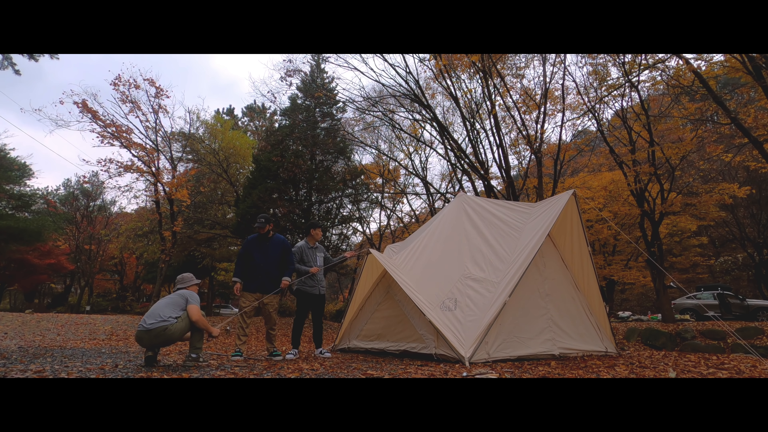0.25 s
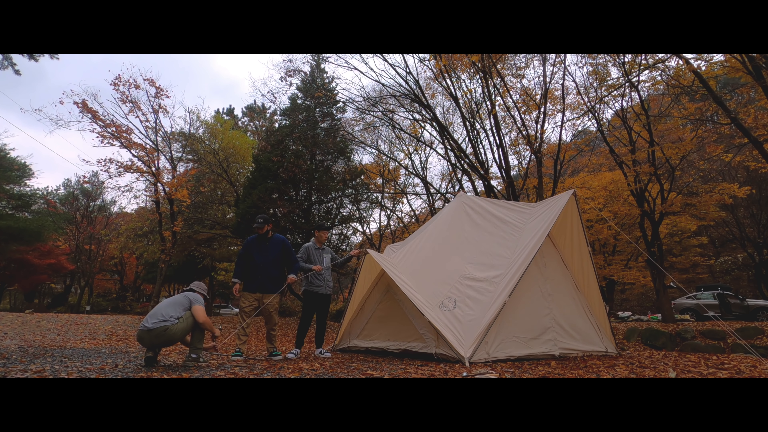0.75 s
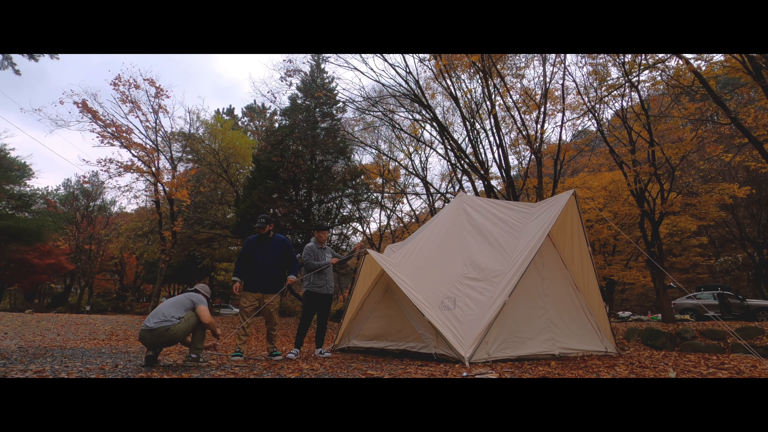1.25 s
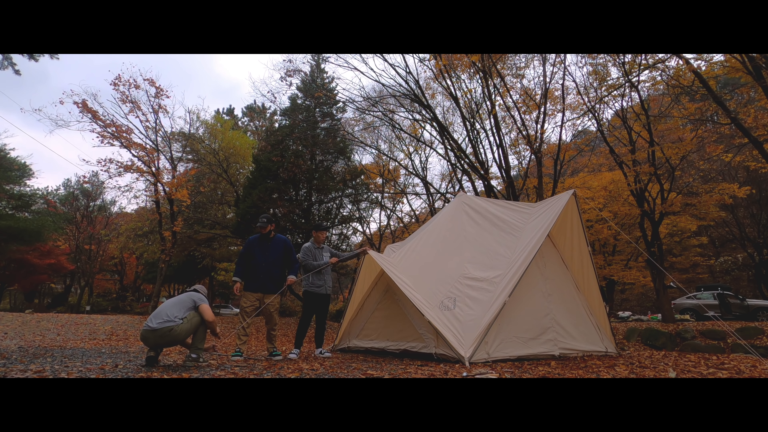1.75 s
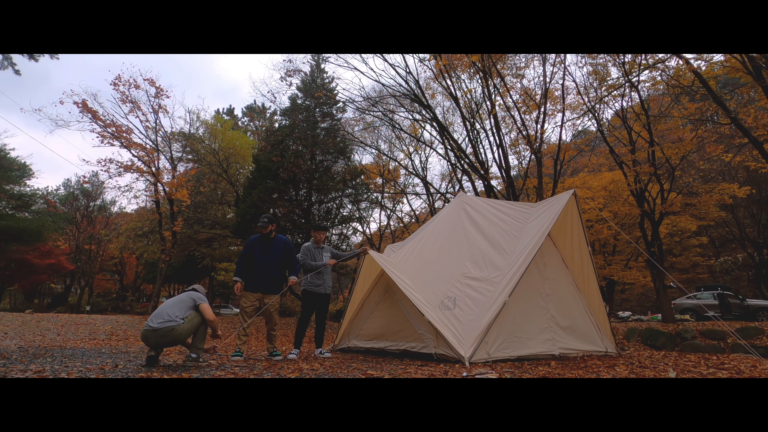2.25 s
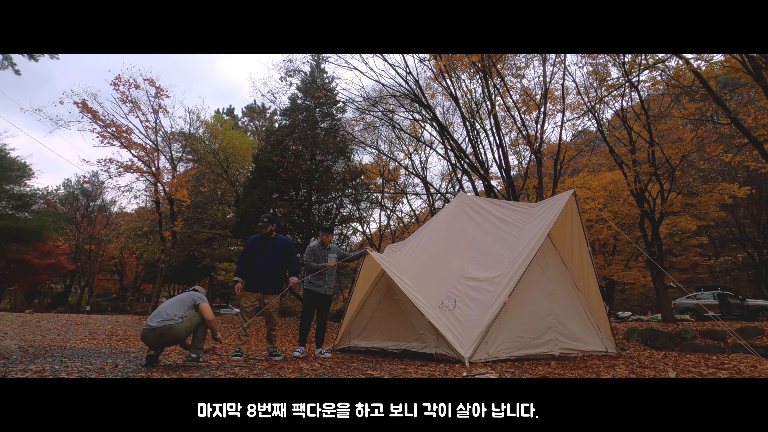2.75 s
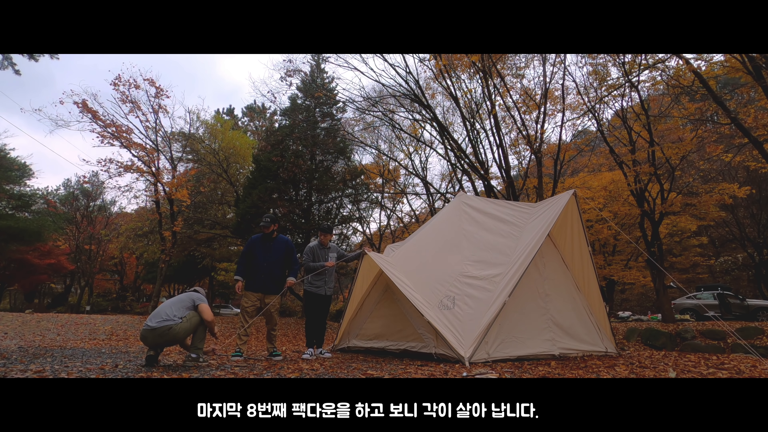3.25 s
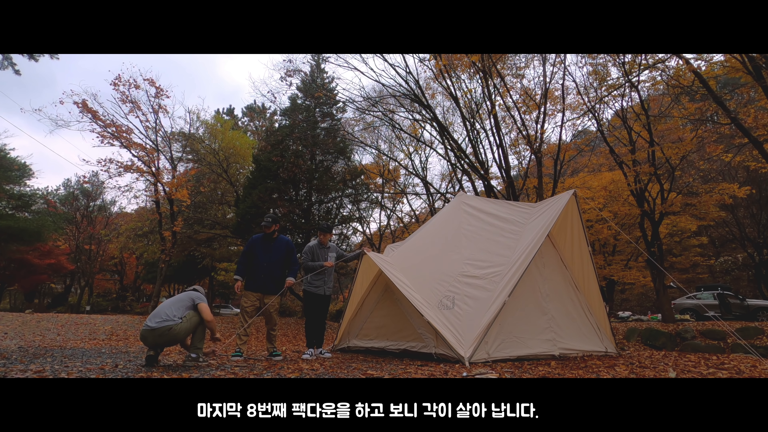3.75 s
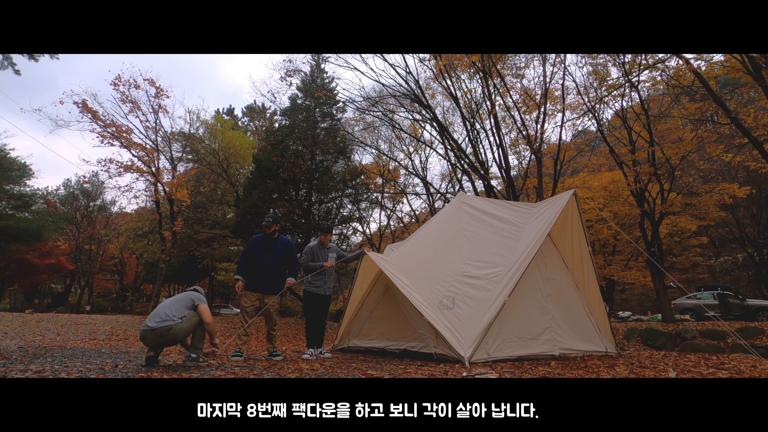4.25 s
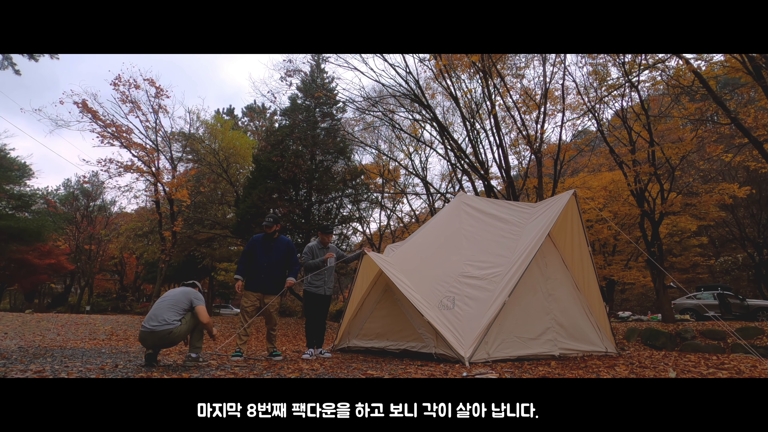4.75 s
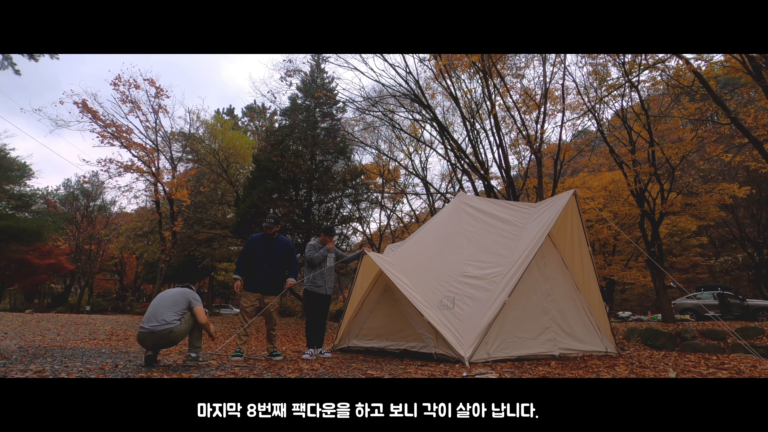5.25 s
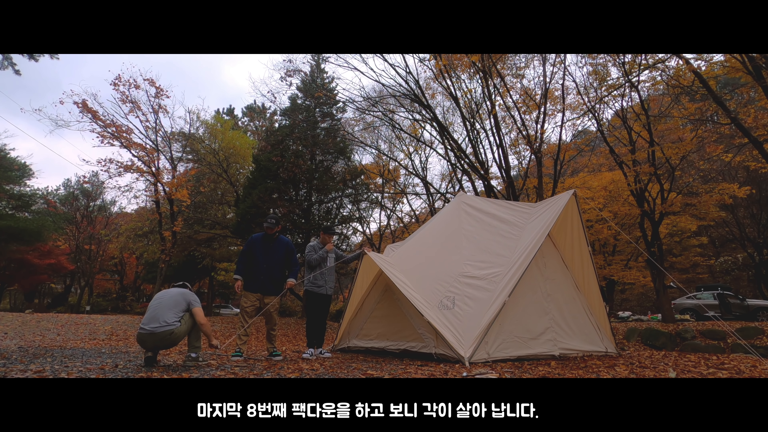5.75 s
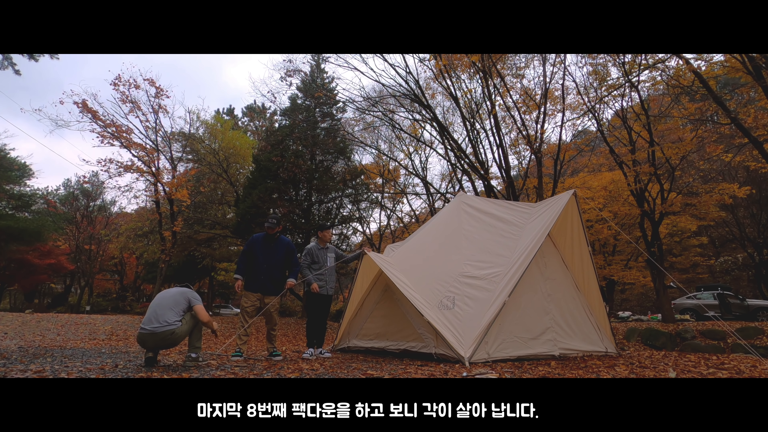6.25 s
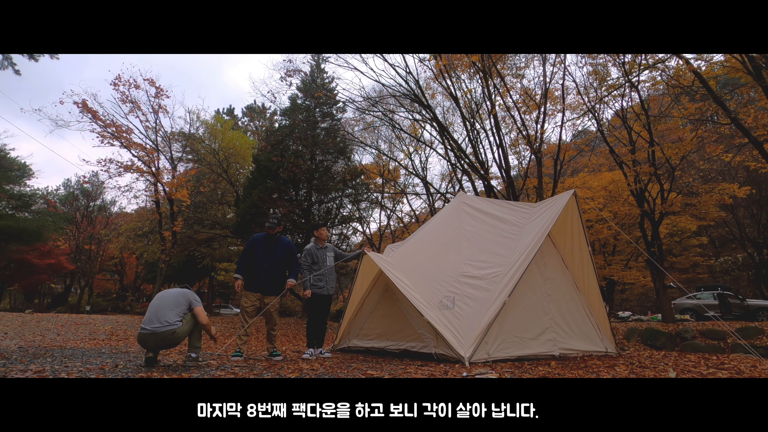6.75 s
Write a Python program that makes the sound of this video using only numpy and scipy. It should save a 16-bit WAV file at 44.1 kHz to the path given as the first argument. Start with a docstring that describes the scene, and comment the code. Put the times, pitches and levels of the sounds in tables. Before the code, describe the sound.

At a wooded campsite, a shoe scuffs gritty soil and loose metal pegs jingle lightly. Then a hammer, some metres away, drives a steel tent peg into the ground with quick, even blows. Each one cracks sharply, rings briefly and echoes from the trees, with a dull thud underneath. Faint wind, leaf hiss and a distant low hum lie behind, and soft gusts touch the microphone.

```python
"""A wooded campsite: a hammer drives a steel tent peg into soil, some metres away.
Each blow cracks, rings peg and hammer head, thuds into the ground and echoes from the trees.
Before it, a shoe scuffs and loose pegs jingle. Wind buffets, a far hum wavers, leaves hiss."""
import sys
import numpy as np
from scipy import signal
from scipy.fft import rfft, irfft, next_fast_len
from scipy.io import wavfile
from scipy.ndimage import uniform_filter1d, map_coordinates

SR = 44100
rng = np.random.default_rng(int(sys.argv[2]) if len(sys.argv) > 2 else 0)


def wrap_up_sound(samples):
    """Save the sound to the file named by the first command line argument, as 16-bit audio."""
    columns = np.atleast_2d(samples).T
    # keep every value between -1 and 1, then stretch to whole-number steps
    tamed = np.clip(columns, -1, 1)
    steps = np.round(tamed * 32767).astype(np.int16)
    wavfile.write(sys.argv[1], SR, steps)


N = 308423

# Each row: time in seconds, hum level in dB, wind level in dB.
AIR_LEVELS = [(0, -46.5, -49), (.31, -45.5, -47.5), (.54, -46, -50.5), (.78, -86, -50),
              (1.19, -49.5, -50.5), (1.44, -50.5, -51), (1.56, -67, -51.5), (1.83, -54.5, -56.5),
              (2.3, -54.5, -56), (3.1, -65, -53.5), (3.35, -62, -56), (4.46, -50, -56), (4.8, -65.5, -56),
              (5.37, -50.5, -57), (5.68, -51, -56.5), (5.96, -56, -54.5), (6.99, -57.5, -54)]


def amp(db):
    return 10 ** (np.asarray(db) / 20)


def unit(x):
    return x / np.sqrt(np.mean(x ** 2) + 1e-20)


def along(points, hz):
    """Interpolate (Hz, value) points on a log axis."""
    f, v = np.transpose(points)
    return np.interp(np.log(hz + 1), np.log(f + 1), v)


def curves(rows):
    """One value per sample for each column after the time."""
    times_s, *cols = np.transpose(rows)
    return [np.interp(np.arange(N) / SR, times_s, c) for c in cols]


def wobble(knots_per_s):
    """Smooth random curve."""
    knots = rng.standard_normal(int(N * knots_per_s / SR) + 4)
    return map_coordinates(knots, [np.arange(N) * knots_per_s / SR])


def noise(spectrum, size):
    """Coloured noise of rms 1."""
    m = next_fast_len(size)
    gain = amp(along(spectrum, np.fft.rfftfreq(m, 1 / SR)))
    return unit(irfft(rfft(rng.standard_normal(m)) * gain, m)[:size])


def ring(t, hz, t60_s, attack_s):
    """One damped mode, soft start, random phase."""
    envelope = amp(-60 * t / t60_s) * (1 - np.exp(-t / attack_s))
    return envelope * np.sin(2 * np.pi * (hz * t + rng.random()))


def add(track, start_s, x):
    track[round(start_s * SR):][:len(x)] += x


def buffeting():
    """Gusts hit the microphone: lumpy rumble over a deeper part."""
    # Each row: time in seconds, rumble level in dB, deep level in dB.
    gusts = [(0, -41.5, -90), (.056, -74, -81), (.114, -74, -71), (.17, -33, -60), (.21, -37, -55),
             (.386, -46, -62), (.572, -49, -62), (.62, -67, -78), (1.27, -55.5, -70), (1.31, -58, -37.5),
             (1.37, -45, -39), (1.48, -58, -51), (1.55, -66, -70), (3.0, -69, -77), (4.3, -56.5, -79),
             (5.1, -70, -65), (5.22, -49.5, -56), (5.7, -62, -90), (6.4, -54, -52), (6.99, -55, -67)]
    # Each row of both: frequency in Hz, level in dB.
    rumble_spectrum = [(35, -42), (58, 5.5), (90, 2.5), (140, -6.5), (300, -23), (2000, -120)]
    deep_spectrum = [(15, -39), (30, -8), (45, 13), (60, -1), (100, -59), (1000, -120)]
    rumble_db, deep_db = curves(gusts)
    rumble = unit(amp(0.57 * wobble(40)) * noise(rumble_spectrum, N))
    return amp(rumble_db) * rumble + amp(deep_db) * noise(deep_spectrum, N)


def far_hum():
    """A low tone wavering in pitch and level."""
    hum_db, _ = curves(AIR_LEVELS)
    waver_db = 2.2 * wobble(14) + 3.7 * wobble(8)
    pitch_hz = 122.3 + 4 * wobble(11)
    return amp(hum_db + waver_db) * np.sin(2 * np.pi * np.cumsum(pitch_hz) / SR)


def wind():
    """Wind in the crowns; the hiss of leaves weakly follows its level."""
    # Each row of both: frequency in Hz, level in dB.
    crown_spectrum = [(40, -3), (130, 8), (210, 9), (290, 1.5), (520, -4.5), (800, -5.5), (1120, 1.5),
                      (1350, 1.5), (1950, -4.5), (3500, -11), (8000, -27), (16400, -92)]
    leaf_spectrum = [(800, -31), (2000, -5.5), (4000, -4.5), (6500, -6.5), (7600, -5), (8600, -20.5),
                     (13000, -28.5), (14300, -36), (15200, -70)]
    _, wind_db = curves(AIR_LEVELS)
    crowns = amp(wind_db + 0.78 * wobble(19)) * noise(crown_spectrum, N)
    leaves_db = -60 + 0.2 * (wind_db - wind_db.mean())
    flutter_db = 1.1 * wobble(40) - 0.3 * wobble(3.57)
    return crowns + amp(leaves_db + flutter_db) * noise(leaf_spectrum, N)


def shoe_scuff():
    """A shoe drags on gritty soil."""
    # Each row: time in seconds, level in dB.
    drag = [(0.04, -50.5), (0.142, -51), (0.158, -41), (0.232, -48), (0.24, -42), (0.252, -58), (0.29, -54)]
    # Each row: frequency in Hz, level in dB.
    grit_spectrum = [(200, -23), (450, -6), (700, -7.5), (1200, -6.5), (2500, -20), (4600, -16.5),
                     (6000, -24), (16400, -67)]
    level_db, = curves([(drag[0][0] - .008, -100), *drag, (drag[-1][0] + 0.0097, -100)])
    return amp(level_db) * unit(amp(2.8 * wobble(151)) * noise(grit_spectrum, N))


def knock(hz):
    """A soft contact: two heavily damped modes."""
    t = np.arange(SR // 20) / SR
    return ring(t, hz, .008, .0007) + .7 * ring(t, hz * .45, .013, .0007)


def knocks():
    """Dull contacts of feet, gear and the rebounding hammer."""
    # Each row: start in seconds, level in dB, pitch in Hz.
    contacts = [(0.064, -35, 1210), (0.15, -28, 627), (0.203, -25, 955), (0.235, -28, 670),
                (0.614, -32, 1120), (0.701, -35, 1150), (1.403, -26.5, 1120), (2.719, -21, 1090),
                (2.986, -20.5, 502), (3.222, -33.5, 1200), (3.581, -24.5, 647), (6.275, -24.5, 1110),
                (6.654, -17.5, 570)]
    out = np.zeros(N + SR)
    for start_s, db, hz in contacts:
        add(out, start_s, amp(db) * knock(hz))
    return out[:N]


def peg_bag():
    """Loose pegs tick, favouring modes near the struck pitch; hands and a sleeve rustle."""
    # Each row: start in seconds, level in dB, struck pitch in Hz.
    ticks = [(0.1018, -36, 5600), (0.127, -30.5, 4520), (0.352, -38, 4830), (0.3755, -37.5, 4970),
             (0.675, -38.5, 6200), (0.724, -28.5, 8500), (0.735, -26, 6200), (0.741, -25.5, 8450),
             (0.7452, -23, 6390), (0.754, -31, 6330), (0.766, -24, 6080), (0.7724, -26, 8460),
             (0.822, -38, 6340), (0.9852, -42, 4940), (1.0873, -37, 6200), (1.1017, -31.5, 7340),
             (1.1428, -36, 4790), (1.196, -25.5, 6200), (1.259, -33.5, 4500), (6.559, -50, 6200)]
    # Each row: start in seconds, hold in seconds, level in dB.
    rustles = [(.672, .008, -59), (.745, 0.051, -45.5), (1.01, .025, -46.5), (1.098, 0.0045, -48),
               (1.196, 0.0078, -43.5), (1.74, 0.077, -51)]
    # Each row of both: frequency in Hz, level in dB.
    peg_modes = [(4800, -8.5), (6200, -4.5), (7420, -3.5), (8480, -4.5), (11400, -11), (14300, -25)]
    bag_spectrum = [(1500, -7.5), (2600, -4), (4600, 2.5), (6200, 2.5), (8500, -4), (9600, -12.5),
                    (13800, -24), (14800, -36), (16400, -80)]
    out, t, now_s = np.zeros(N + SR), np.arange(SR // 10) / SR, np.arange(N) / SR
    for start_s, db, struck_hz in ticks:
        modes = sum(amp(mode_db - 24 * abs(np.log2(hz / struck_hz)) + rng.normal(0, 2.1))
                    * ring(t, hz, t60_s=0.018, attack_s=0.00029) for hz, mode_db in peg_modes)
        snap = (1 - np.exp(-(t / 0.00091) ** 2)) * amp(-60 * t / 0.0057) * noise(bag_spectrum, len(t))
        add(out, start_s, amp(db) * (modes + .8 * snap))
    grains = unit(amp(3.5 * wobble(500)) * noise(bag_spectrum, N))
    rise_db_per_s, fall_db_per_s = 679, 512
    hands = sum(amp(db - rise_db_per_s * np.maximum(start_s - now_s, 0)
                    - fall_db_per_s * np.maximum(now_s - start_s - hold_s, 0))
                for start_s, hold_s, db in rustles)
    return out[:N] + hands * grains


def steel_crack(t):
    """Steel on steel: the first contact with its rattle, and a bare bounce."""
    # Each row: frequency in Hz, level in dB.
    spectrum = [(250, -19), (570, -26.5), (1070, -13.5), (2000, -15.5), (3400, -4), (5100, -5),
                (6500, -5.5), (7900, -4.5), (8700, -16.5), (10500, -20.5), (14700, -37), (15600, -54),
                (16400, -75)]
    snap = (1 - np.exp(-(t / .001) ** 3)) * amp(-60 * t / .008)
    rattle = (1 - np.exp(-t / 0.00077)) * amp(-17 - 60 * t / 0.032)
    return (snap + rattle) * noise(spectrum, len(t)), snap * noise(spectrum, len(t))


def peg_ring(t, hz):
    """Two close modes of the peg, damped by soil."""
    return ring(t, hz * .98, .022, .0011) + amp(rng.normal(-1, 2)) * ring(t, hz * 1.022, .022, .0011)


def head_ring(t, hz, t60_s):
    """The hammer head rings until the hand tightens for the upswing."""
    # Each row: frequency ratio, level in dB.
    modes = [(1.002, 1), (1.548, -27), (2.37, -34.5), (2.55, -42)]
    grip = amp(-230 * np.clip(t - .105, 0, .1))
    return grip * sum(amp(db) * ring(t, ratio * hz, t60_s, 0.00011) for ratio, db in modes)


def soil_jolt(out, start_s, t, grit_db):
    """Add grit settling round the peg, a dull jolt and its slaps off flat surfaces."""
    # Each row: frequency in Hz, level in dB.
    spectrum = [(150, -32), (300, 1), (600, -1.5), (1050, 2), (1800, -4.5), (3000, 1), (16400, -100)]
    # Each row: delay in seconds, level over the grit in dB.
    slaps = [(.021, -18), (.041, 9), (.15, -20)]
    lumps_db = 2.5 * np.interp(t * 120, np.arange(64), rng.standard_normal(64))
    grit = amp(grit_db - 60 * t / 0.36 + lumps_db) * noise(spectrum, len(t))
    jolt = amp(grit_db + 15.5) * knock(1050 * amp(rng.normal(0, 1.0)))
    for part in (grit, jolt):
        add(out, start_s - .0002, part)
    for delay_s, db in slaps:
        slap = knock(1100 * amp(rng.normal(0, 1.5)))
        add(out, start_s + delay_s, amp(grit_db + db + rng.normal(0, 0.83)) * slap)


def ground_thud(out, start_s, t, thud_db):
    """Add the thud and its returns; low waves cross the soil more slowly."""
    # Each row: frequency in Hz, level in dB, t60 in seconds, lag in seconds.
    modes = [(60.6, -5, 0.15, 0.0125), (149.2, 0, 0.13, 0.00885), (249.4, 3, 0.063, 0.0026),
             (462, -10, 0.09, 0.00403)]
    # Each row: delay in seconds, level in dB.
    arrivals = [(0.0, 0), (.062, -12), (.15, -17)]
    for hz, mode_db, t60_s, lag_s in modes:
        for delay_s, arrival_db in arrivals:
            wave = ring(t, hz * amp(rng.normal(0, 0.67)), t60_s, 0.003)
            level_db = thud_db + mode_db + arrival_db + rng.normal(0, 1.9)
            add(out, start_s + lag_s + delay_s, amp(level_db) * wave)


def far_click(size):
    """The crack as the trees scatter it, tinted anew for each blow."""
    # Each row: frequency in Hz, level in dB.
    spectrum = [(500, -79), (1000, -22), (2000, -8.5), (2700, -4.5), (4000, 0), (5500, -6.5), (7000, 1.5),
                (7900, -2), (8500, -13), (13400, -22), (14900, -34), (16400, -60)]
    hz = np.fft.rfftfreq(256, 1 / SR)
    click = np.fft.fftshift(irfft(amp(along(spectrum, hz) + rng.normal(0, 2.1, len(hz)))))
    return np.pad(click, (0, size - len(click)))


def tree_scatter():
    """Echo response of many trunks, new each call, rms 1 over 30-120 ms."""
    # Each row: frequency in Hz, t60 in seconds.
    decay = [(300, 0.17), (1000, 0.91), (2800, 0.68), (7500, 0.65), (12000, 0.39)]
    # Each row: delay in seconds, spread in seconds, boost in dB.
    strong_returns = [(0.06, 0.0075, 3), (0.14, 0.004, 4), (0.11, 0.0083, 1.5)]
    hz, t, bins = signal.stft(rng.standard_normal(SR * 2 // 3), SR, nperseg=128)
    swell_db = sum(db * np.exp(-.5 * ((t - delay_s) / spread_s) ** 2)
                   for delay_s, spread_s, db in strong_returns)
    clumps_db = 0.57 * unit(uniform_filter1d(rng.standard_normal(len(t)), size=5))
    decay_db = -60 * t / along(decay, hz)[:, None]
    rise = 1 - np.exp(-t / 0.0027)
    tail = signal.istft(bins * rise * amp(swell_db + clumps_db + decay_db), SR, nperseg=128)[1]
    return tail / np.std(tail[SR * 3 // 100:SR * 12 // 100])


def hammer():
    """Each blow cracks twice within 2 ms, rings the steel, shakes the soil and echoes."""
    # Each row: start in seconds; thud, soil, crack and peg levels in dB; peg pitch in Hz;
    # head level in dB; head t60 in seconds; echo levels of crack, peg and head in dB.
    blows = [(1.496, -46, -59, -6.5, -11.5, 7590, -22, 0.49, -54, -56, -62),
             (1.782, -39.5, -47, -2.5, -10, 7540, -25, 0.27, -48.5, -50, -49),
             (2.071, -35, -38.5, -3, -22.5, 7560, -34.5, 0.29, -46.5, -47, -55),
             (2.359, -34, -42.5, -3.5, -25, 7480, -63, 0.12, -47, -46.5, -70),
             (2.661, -36.5, -38.5, -3.5, -13, 7524, -34, 0.57, -45, -44.5, -52.5),
             (2.964, -38.5, -42, -3, -13, 7460, -31.5, 0.24, -44.5, -44.5, -57),
             (3.267, -37.5, -48, -4, -11, 7510, -53, 0.08, -45.5, -44, -71),
             (3.566, -39.5, -41.5, -5, -17, 7500, -52, 0.092, -44, -47, -54.5),
             (3.868, -32, -40, -5.5, -12.5, 7395, -18.5, 0.062, -44, -46.5, -47.5),
             (4.158, -37, -44.5, -5.5, -17.5, 7470, -53, 0.092, -46.5, -45.5, -60.5),
             (4.459, -33, -43, -8, -18.5, 7590, -15.5, 0.04, -48.5, -48.5, -45),
             (4.796, -29.5, -38.5, -5, -19, 7720, -34.5, 0.27, -47, -53, -59),
             (5.15, -31, -40, -7, -23, 7750, -28, 0.12, -47.5, -52.5, -55),
             (5.508, -29, -37, -5.5, -13.5, 7620, -14.5, 0.018, -43, -45.5, -50),
             (5.88, -29.5, -38, -5, -20, 7630, -59, 0.11, -44, -47, -54.5),
             (6.255, -26, -38.5, -7, -13.5, 7620, -18, 0.04, -45, -53, -43),
             (6.63, -22.5, -36, -5, -19, 7990, -26.5, 0.053, -43, -57, -46)]
    out, t = np.zeros(N + 2 * SR), np.arange(SR // 2) / SR
    t_short = t[:SR // 10]
    for (start_s, thud_db, soil_db, crack_db, peg_db, peg_hz, head_db, head_t60_s,
         echo_crack_db, echo_peg_db, echo_head_db) in blows:
        head_hz = rng.normal(3928, 5.8)  # varies with the point of contact
        crack, bounce = steel_crack(t_short)
        peg = peg_ring(t_short, peg_hz)
        head = head_ring(t, head_hz, head_t60_s)
        head_tail = amp(echo_head_db + 7) * ring(t, head_hz, t60_s=0.6, attack_s=.006)
        shank_bend = ring(t_short, 2540 * amp(rng.normal(0, 0.84)), 0.0048, 0.0011)
        sends = [(far_click(len(t_short)), echo_crack_db),
                 (peg + 0.74 * ring(t_short, peg_hz, 0.039, 0.0014), echo_peg_db),
                 (ring(t_short, head_hz, 0.035, 0.00058), echo_head_db),
                 (shank_bend, -62.5 + 1.95 * (start_s - blows[0][0])),
                 (ring(t_short, 230, 0.0095, 0.0014), thud_db - 23)]
        to_trees = sum(amp(db) * x / np.linalg.norm(x) for x, db in sends)
        echo = signal.fftconvolve(to_trees, tree_scatter())
        for part in (amp(crack_db) * crack, amp(peg_db) * peg, amp(head_db) * head, head_tail, echo):
            add(out, start_s - .0002, part)
        bounce_db = crack_db + rng.normal(-0.65, 0.5) - 2.6 * start_s  # weaker as the peg sinks
        add(out, start_s + 0.0016, amp(bounce_db) * bounce)
        soil_jolt(out, start_s, t, soil_db)
        ground_thud(out, start_s, t, thud_db)
    return out[:N]


def scene():
    return (hammer() + knocks() + shoe_scuff() + peg_bag() + buffeting() + far_hum() + wind())[None]


def record(dry):
    """Round off the sharpest peaks, then limit the band."""
    ceiling, top_hz = .56, 16500
    soft = dry / (1 + np.abs(dry / ceiling) ** 4) ** (1 / 4)
    m = next_fast_len(N + SR // 2)
    return irfft(rfft(soft, m) * (np.fft.rfftfreq(m, 1 / SR) < top_hz), m)[:, :N]


dry = scene()
out = record(dry)
wrap_up_sound(out)
```